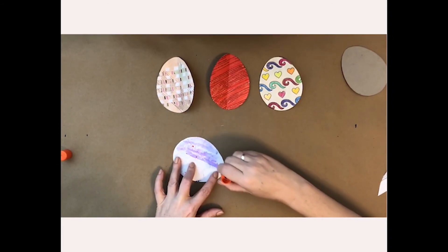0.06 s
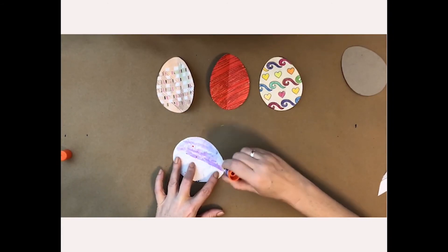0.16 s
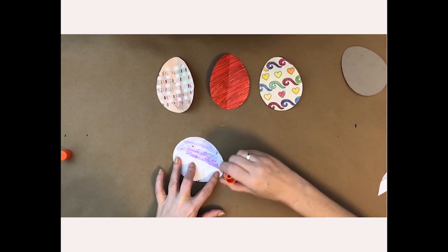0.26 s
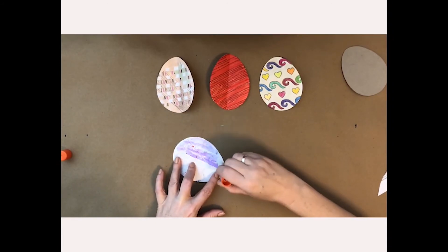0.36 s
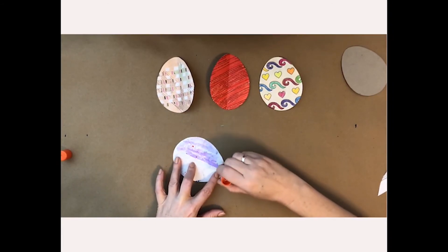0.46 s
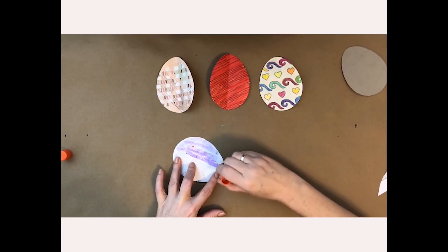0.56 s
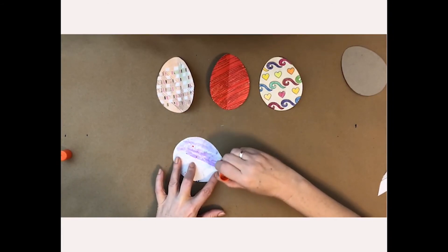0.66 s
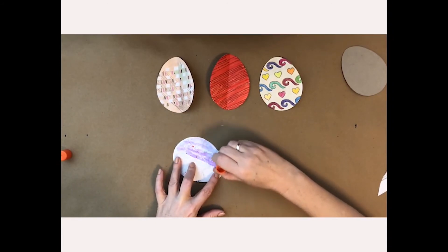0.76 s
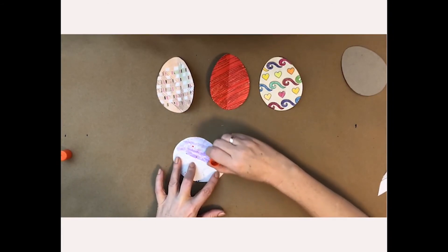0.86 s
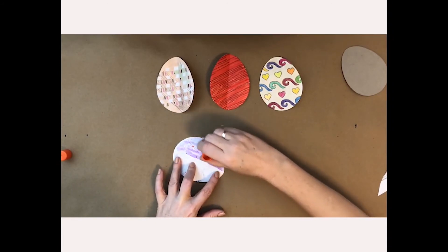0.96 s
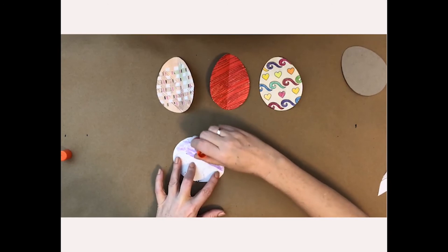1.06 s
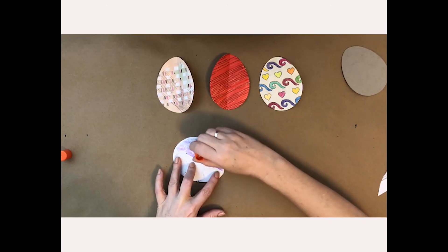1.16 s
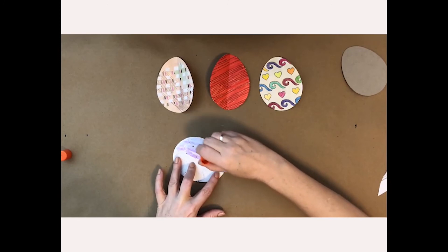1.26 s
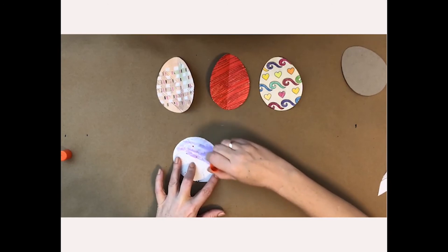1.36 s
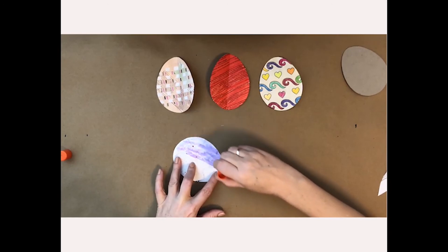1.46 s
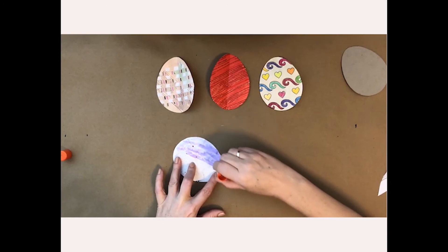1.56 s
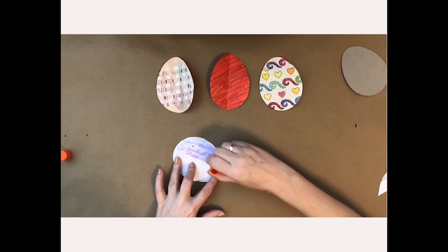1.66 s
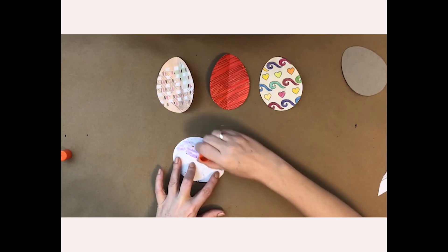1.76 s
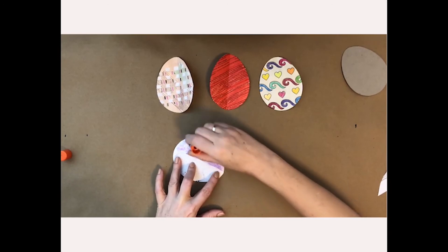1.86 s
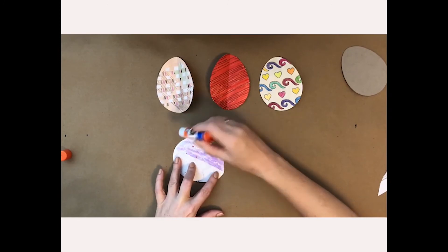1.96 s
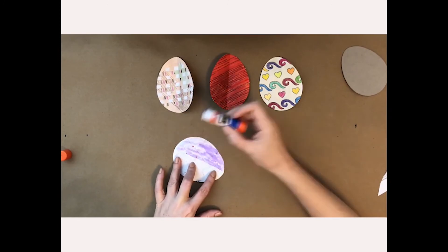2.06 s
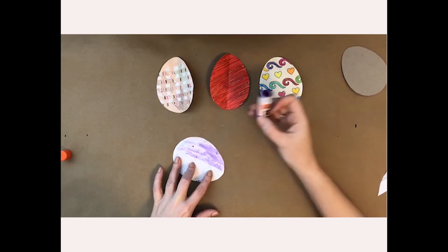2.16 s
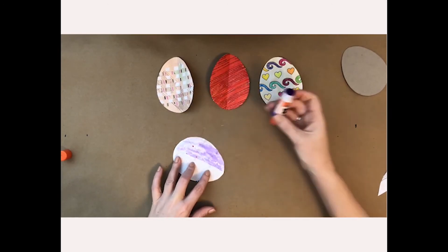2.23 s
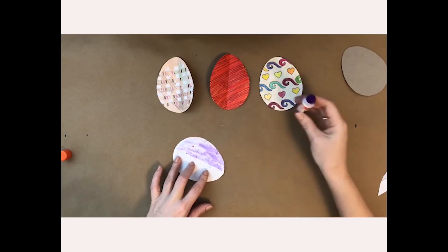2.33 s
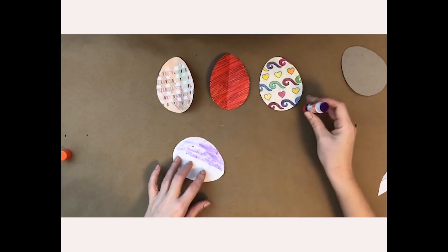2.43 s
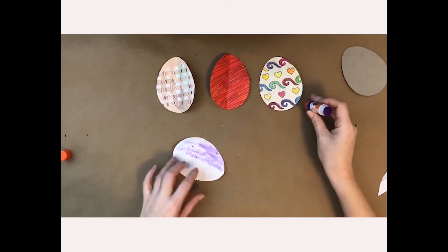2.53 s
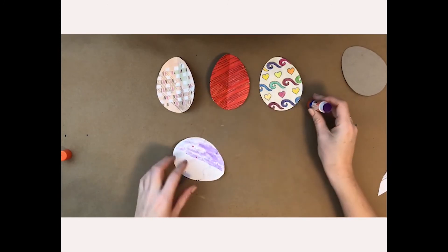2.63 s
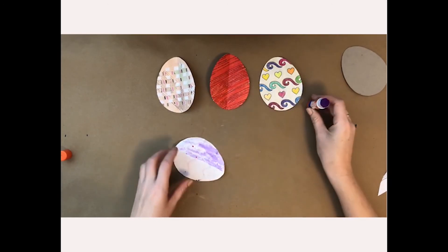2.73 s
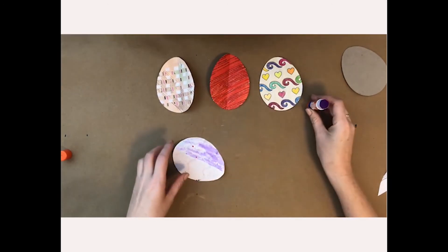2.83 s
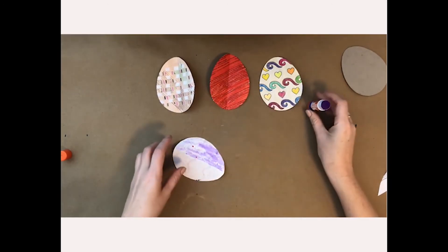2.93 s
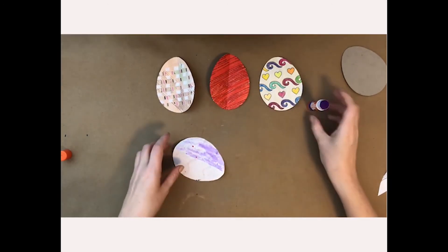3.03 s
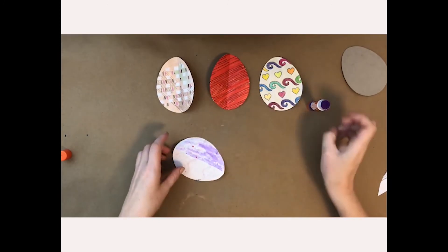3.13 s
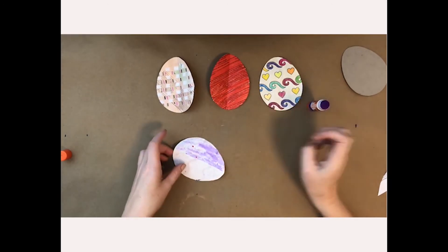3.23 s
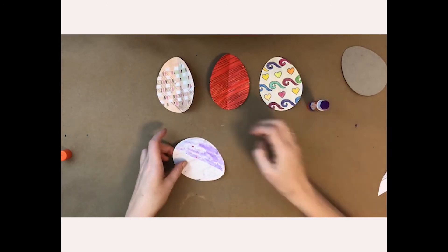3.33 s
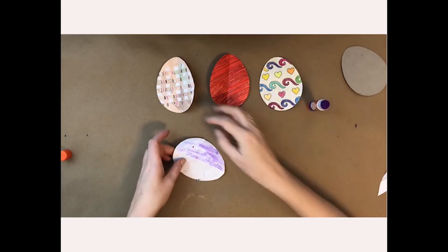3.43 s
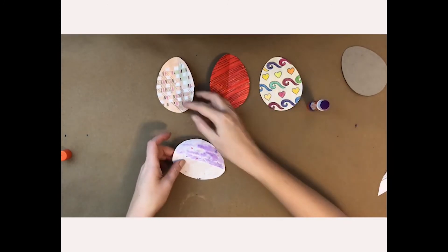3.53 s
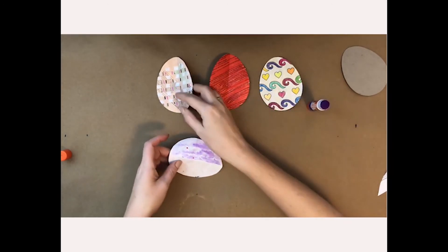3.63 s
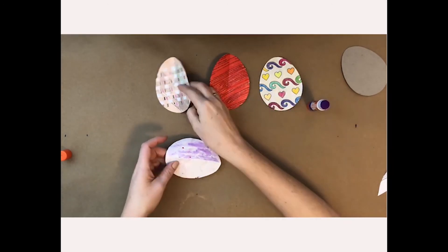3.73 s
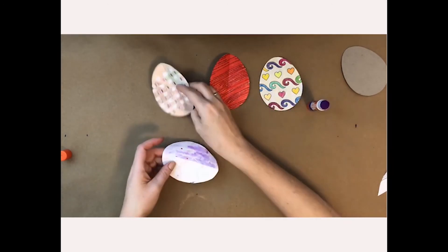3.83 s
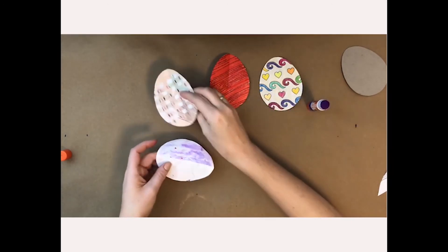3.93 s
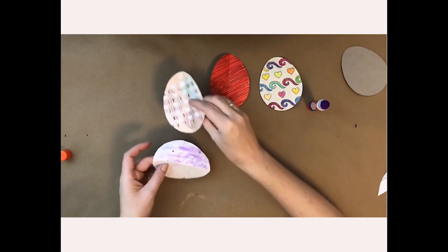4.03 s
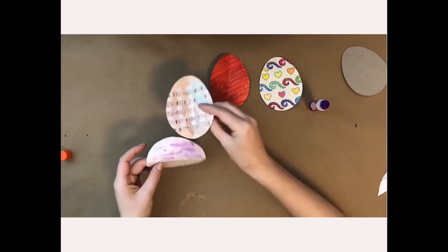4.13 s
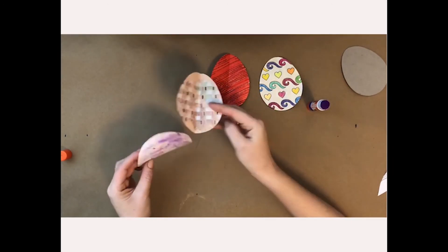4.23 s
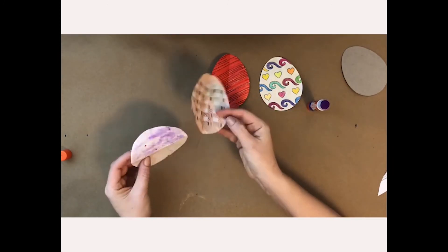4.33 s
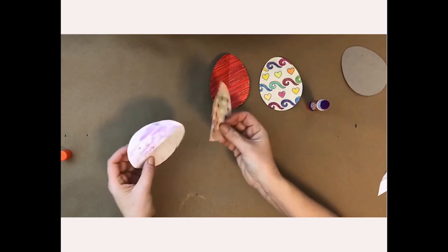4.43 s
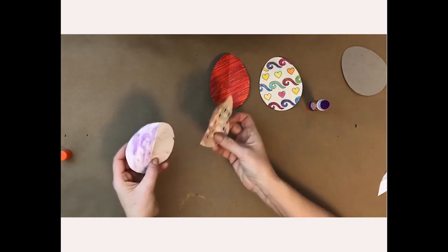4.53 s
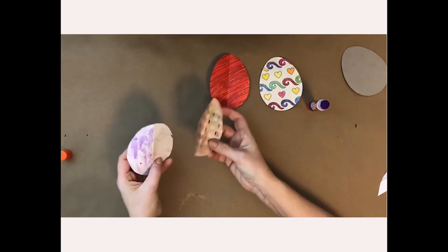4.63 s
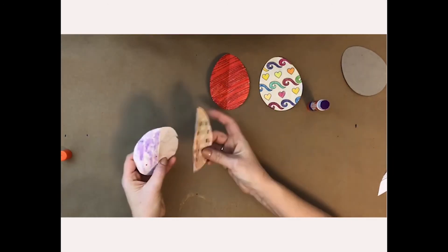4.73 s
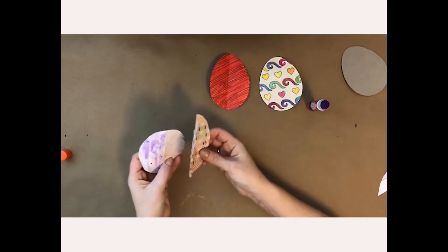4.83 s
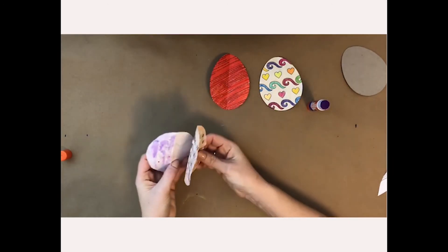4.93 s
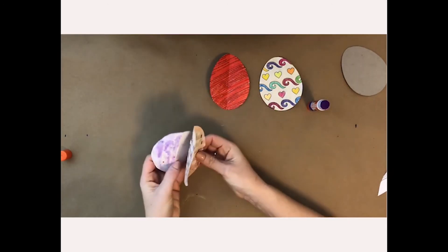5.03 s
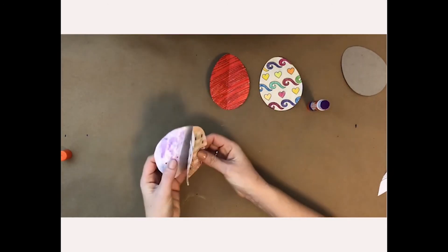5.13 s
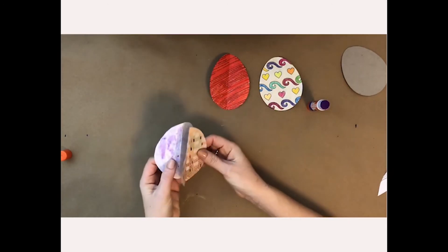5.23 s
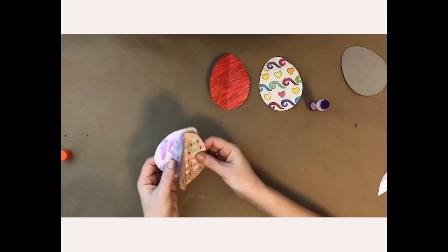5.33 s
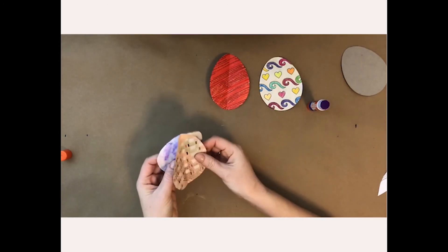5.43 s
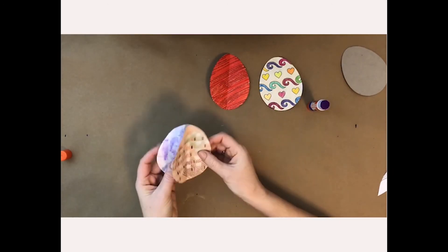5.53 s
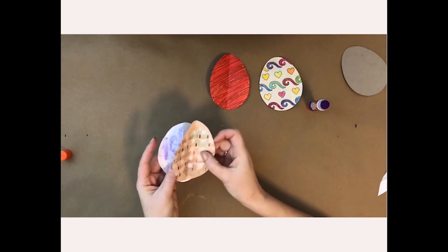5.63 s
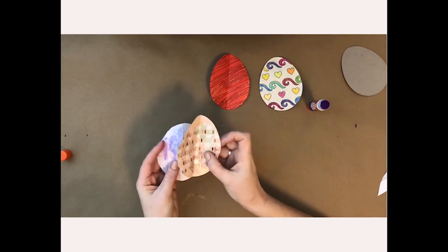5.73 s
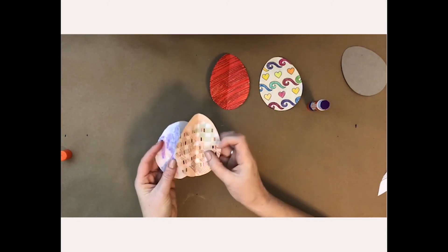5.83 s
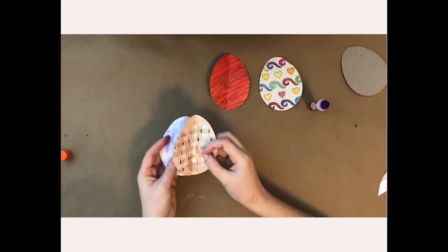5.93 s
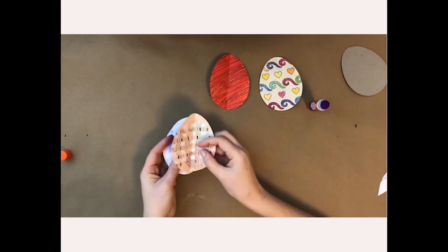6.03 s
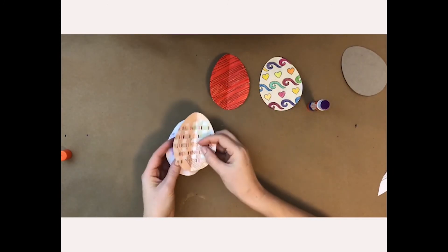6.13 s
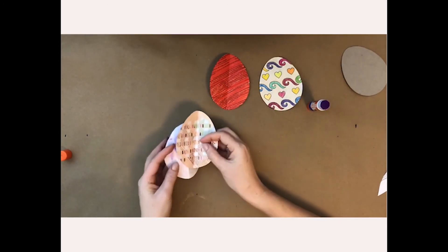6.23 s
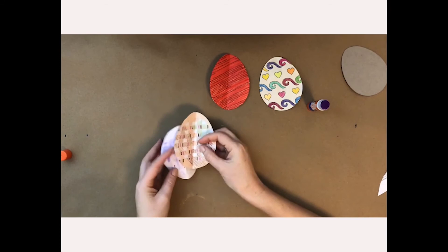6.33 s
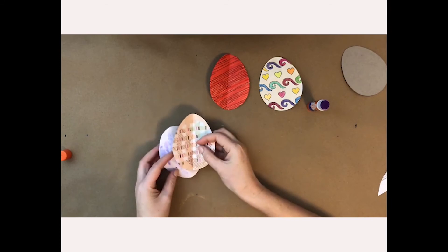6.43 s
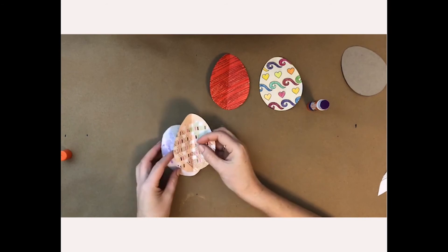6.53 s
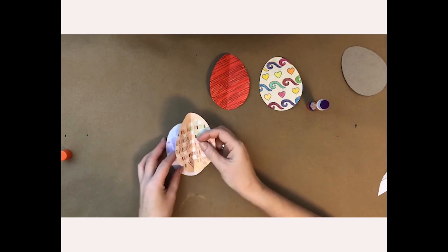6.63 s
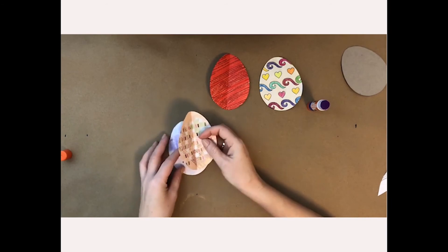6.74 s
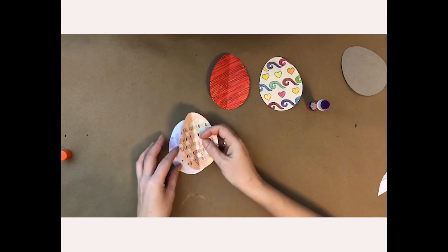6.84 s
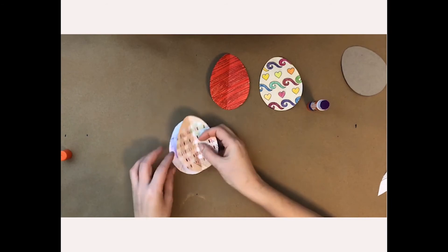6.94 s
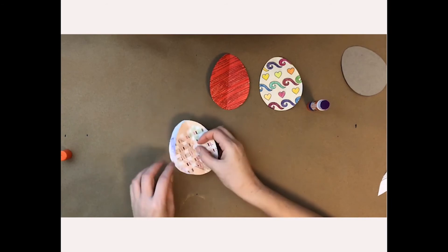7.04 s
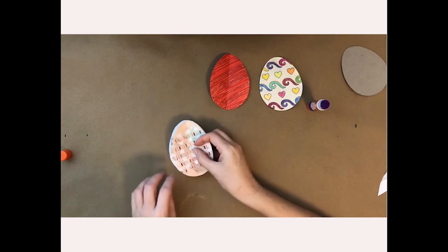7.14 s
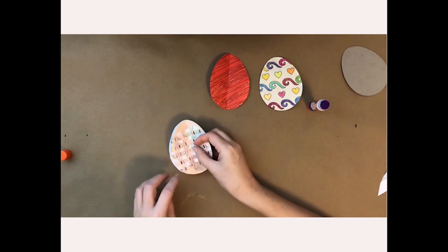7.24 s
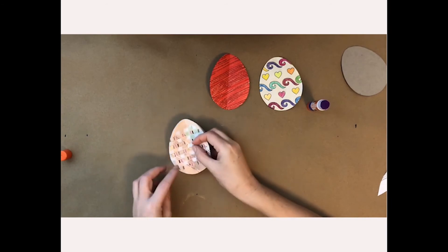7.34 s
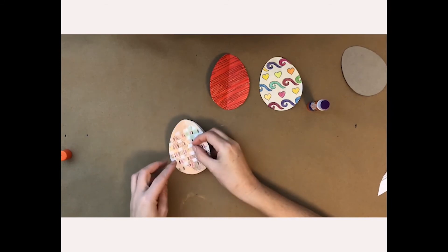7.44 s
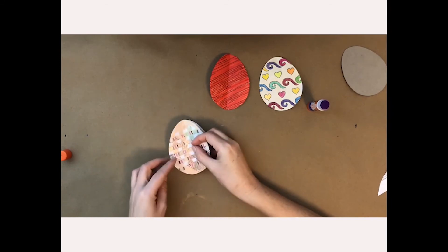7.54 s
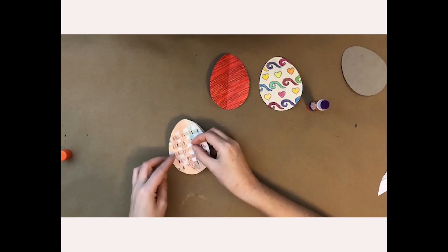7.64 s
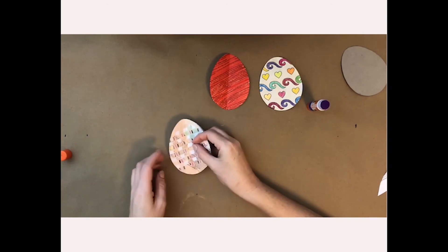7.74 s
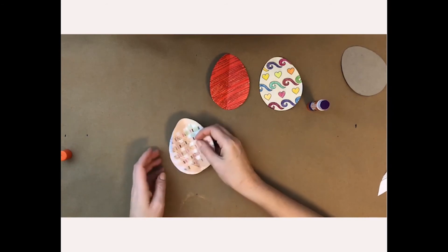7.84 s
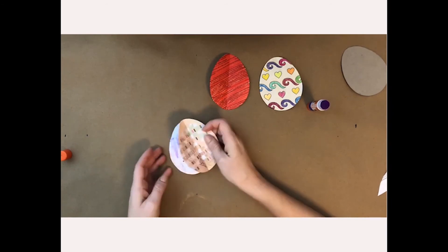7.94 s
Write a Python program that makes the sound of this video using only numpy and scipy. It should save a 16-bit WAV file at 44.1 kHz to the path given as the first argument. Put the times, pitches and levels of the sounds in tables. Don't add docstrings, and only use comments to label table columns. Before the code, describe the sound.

Muffled, low thuds come irregularly from a wooden tabletop under paper. A faint scrape leads to one loud, sharp clack with a tiny rocking rattle and short woody ring. Folded card is then picked up and joined, with dry rustles, small creasing snaps and sticky ticks, densest late, ending in soft slides. One nearby phone-like microphone, small room, gentle hum and hiss.

```python
import sys
import numpy as np
from scipy import signal
from scipy.fft import rfft, irfft, next_fast_len
from scipy.io import wavfile
from scipy.ndimage import uniform_filter1d

SR = 44100
rng = np.random.default_rng(int(sys.argv[2]) if len(sys.argv) > 2 else 0)


def volts(x):
    e = np.asarray(x, float) / 20
    return 10 ** e


def file_out(sig):
    cols = np.atleast_2d(sig).T
    lim = np.clip(cols, -1, 1)
    pcm = np.round(lim * 32767).astype(np.int16)
    wavfile.write(sys.argv[1], SR, pcm)


N = 352359

# frequency in Hz, level in dB per Hz.
AIR_SPECTRUM = [(12, -34), (40, -6), (95, -3.5), (245, -14), (324, -6), (362, -23), (393, -11.5),
                (2400, -14), (5230, -13.5), (15500, -18)]
# frequency in Hz, width in Hz, lift in dB.
ROOM_MODES = [(40, 2.3, -20), (91.1, 7.6, 10), (151, 6.7, 9), (219, 11, 15.5), (231, 17, -6.5),
              (309.4, 19.5, -14), (330.6, 37, 9), (362, 30, -13), (370, 7.2, -16), (480, 22, -17),
              (647, 280, 3.5)]
# peak time, rise and fall in seconds, level in dB.
GUSTS = [
    (1.96, 0.27, 0.33, -45),
    (3.34, 0.31, 0.38, -45),
    (4.78, 0.28, 0.26, -47.5),
    (5.45, 0.45, 0.35, -53),
    (7.56, 0.12, 0.27, -49),
]
AIR_DB, RUMBLE_DB, RUMBLE_DRIFT_DB = -54, -75, 8
ROOM_T60_S, ROOM_DB = 0.15, -10

# start in seconds, peak in dB,
# hardness 0-1.
THUDS = [(0.512, -47, 0), (0.812, -59, 0.3), (1.184, -38.5, 0.16), (1.597, -43, 0.19), (1.791, -53, 0.1),
         (3.091, -51.5, 0.6), (3.744, -63, 0.5), (4.241, -57, 1), (4.748, -57, 0), (5.198, -63, 0.2),
         (5.42, -61, 0.6), (6.092, -58, 0), (6.439, -59, 0.7), (6.63, -59, 0.5), (6.777, -45.5, 0),
         (7.069, -62, 0.5), (7.572, -61, 0.3)]
# frequency in Hz, level in dB, T60 in seconds.
THUD_MODES = [(99.7, 5, 0.31), (134.3, 5.5, 0.32), (160.5, 8.5, 0.2), (227, 0, 0.37), (254, 4, 0.13),
              (328, -5.5, 0.46), (376, 2.5, 0.41), (458, 5, 0.32), (543, -12, .12), (620, -18, .1)]

# frequency in Hz, level in dB, T60 in seconds.
KNOCK_MODES = [(105.2, -9.5, 0.33), (122.7, -19, 0.36), (158, -9.5, 0.17), (262.6, -8.5, 0.17),
               (339.4, -7, 0.24), (380, -16.5, 0.24), (414, -22, 0.15), (511, -20, 0.31), (543, -12, 0.27),
               (597, -5, 0.15), (646, -8, 0.2), (758, -19, 0.15), (790, -16, 0.16), (893, -2.5, 0.074),
               (995, -11, 0.23), (1028, -7.5, 0.068), (1173, -24, 0.16), (1120, -24, 0.19),
               (1210, -20, 0.13), (1260, -13, 0.11), (1390, -18, 0.17), (1400, -27, 0.15),
               (1437, -16, 0.14), (1500, -13, 0.2), (1594, -9.5, 0.15), (1680, -7.5, 0.084),
               (1938, -21, 0.13), (2720, -13.5, 0.099), (2450, -19, .05), (3190, -17.5, 0.09)]
# frequency in Hz, level in dB, T60 in seconds.
STICK_MODES = [(1265, 9, 0.021), (1955, 5.5, 0.0058), (2440, -4.5, 0.024), (4450, -14, 0.014)]
# frequency in Hz, level in dB per Hz.
KNOCK_TAIL = [(90, -32), (200, 0), (330, -8), (480, -14), (700, -3.5), (1300, -11), (1720, -14),
              (1900, -23), (3500, -32.5), (9000, -38.5)]
# start in seconds, level in dB relative to the knock.
BOUNCES = [
    (2.6834, -10),
    (2.703, -11.5),
]
KNOCK_S, KNOCK_DB = 2.6748, -13.5
RIM_S, RIM_DB = 2.6688, -31
PANEL_HZ, PANEL_DB, PANEL_T60_S = (500, 1720), -17, 0.4

# start in seconds, peak in dB, pitch in Hz, brightness in dB.
CREASE_SNAPS = [(3.071, -36, 2620, 0), (3.391, -41, 700, -10), (3.575, -46, 2220, -12),
                (3.733, -39, 804, -15), (3.984, -31.5, 900, -18.5), (4.112, -38, 2570, -6),
                (4.2115, -51, 940, -8), (4.649, -37.5, 680, -12), (4.989, -34, 770, -8),
                (5.149, -31, 800, -10), (5.1875, -35.5, 2650, 10), (5.313, -47, 7500, -20),
                (5.382, -44, 2340, 2), (5.683, -38, 845, 1),
                (6.0246, -23, 2330, -2), (6.074, -31.5, 2600, -0.5), (6.156, -34, 1680, -7),
               (6.213, -31, 2720, -9), (6.221, -27, 2500, -16), (6.433, -31, 2350, -10),
               (6.517, -39, 2220, -10), (6.625, -29.5, 2440, -13), (6.659, -35, 2310, -17),
               (6.682, -32, 2630, -9), (6.762, -26.5, 3220, -22), (6.875, -39, 1680, -10)]
# start in seconds, peak in dB, pitch in Hz, brightness in dB.
FLAPS = [
    (4.221, -45, 980, -18),
    (5.313, -53, 840, -20),
    (6.444, -35, 800, -14),
    (6.625, -31.5, 600, -20),
    (6.766, -29.5, 970, -20),
]
SNAP_T60_S, FLAP_T60_S = 0.039, 0.057

# start in seconds, peak in dB, pitch in Hz.
TICKS = [(1.186, -48, 1600), (1.188, -40, 3300), (3.392, -39, 1500), (3.575, -36, 2200), (3.735, -37, 1200),
         (4.2135, -35, 1060), (4.2123, -24.5, 3120), (4.2045, -31, 2600), (4.2144, -27, 2900),
         (4.2305, -30, 5800), (4.2205, -32.5, 960), (4.9015, -37, 1500), (4.912, -43, 1700),
         (5.1495, -37, 880), (5.1882, -28.5, 2700), (2.4433, -40, 1800), (3.4305, -38, 2450),
         (5.27, -32, 1090), (5.314, -37, 950), (5.280, -34, 1210), (3.707, -39.5, 700), (3.747, -32.5, 800),
         (5.5713, -40, 1200), (6.027, -40, 2380), (6.7624, -26, 3050), (6.7703, -25, 3100),
         (6.0748, -33, 2500), (6.0775, -27, 4000), (6.139, -43, 1520), (6.303, -33, 1600),
         (6.326, -37, 1900), (6.355, -30, 3000), (6.363, -41, 2000), (6.369, -28, 2380), (6.376, -23, 2500),
         (6.383, -32, 2600), (6.394, -24, 4770), (6.434, -35, 2300), (6.440, -38, 2300), (6.449, -36, 2450),
         (6.6265, -30, 800), (6.6828, -27, 2600)]
# start in seconds, peak in dB, pitch in Hz.
CATCHES = [(3.0994, -23, 2710), (3.107, -35, 2910), (3.112, -35, 2690), (3.1155, -29, 2260),
           (3.3921, -33, 705), (3.575, -41, 2300), (3.7935, -36, 2410), (3.8125, -26, 2090),
           (4.2042, -29, 900), (4.4303, -24, 1510), (4.4805, -26, 5060), (4.4969, -29, 4910),
           (4.53, -32, 2500), (4.5465, -34, 2580), (4.5522, -34, 2710), (4.5751, -33, 3290),
           (4.9139, -33, 2950), (4.9269, -27, 3210), (5.1563, -30, 2330), (5.1885, -24, 4780),
           (6.2267, -29, 2520), (6.2302, -34, 2520), (6.3135, -39, 1460), (6.3261, -29, 1960),
           (6.3388, -32, 2300), (6.3633, -28, 2800), (6.3763, -32, 2200), (6.4207, -24, 2130),
           (6.4594, -26, 2410), (6.5809, -26, 2580), (6.5912, -21, 2780), (6.6605, -34, 2350),
           (6.6678, -34, 2580), (6.6871, -33, 2220), (6.6914, -33, 2500), (6.7837, -23, 2820)]
# start in seconds, peak in dB, pitch in Hz.
PRICKS = [(4.2122, -32, 7700), (4.2238, -33, 5600), (4.4667, -34, 5290), (4.8184, -37, 8470),
          (4.9177, -31, 5810), (5.1566, -36, 6350), (5.1845, -30, 6830), (5.3133, -37, 7300),
          (5.5372, -39, 5320), (6.0248, -20, 8900), (6.0262, -25, 7200), (6.0268, -26, 2590),
          (6.0765, -29, 7500), (6.3609, -26, 7470), (6.4362, -33, 9500), (6.377, -30, 7900),
          (6.7615, -29, 5100), (5.288, -38, 900), (6.6605, -35, 1310), (1.188, -44, 2500)]
TICK_CYCLES, CATCH_CYCLES, PRICK_CYCLES = 13, 9, 22
CATCH_DB = -5.5

# middle and length in seconds, level in dB, pitch in Hz.
FLUTTERS = [(2.434, 0.061, -51, 4300), (3.09, 0.031, -46, 2700), (3.621, 0.16, -54, 2230),
            (3.78, 0.039, -45, 3200), (4.484, 0.048, -44, 5170), (4.487, 0.051, -55, 870),
            (4.542, 0.053, -54, 2650), (4.535, 0.08, -47, 1710), (4.923, .05, -46.5, 4570),
            (5.203, 0.023, -51, 5200), (5.283, 0.032, -43, 1210), (6.044, 0.025, -43, 5070),
            (6.326, 0.057, -43, 1570), (6.392, 0.051, -41.5, 4800)]
# peak time and length in seconds, level in dB, pitch in Hz.
RIDGES = [(3.083, 0.065, -50, 4730), (3.11, 0.05, -50, 1340), (3.104, 0.052, -45.5, 2900),
          (3.583, 0.082, -46.5, 2200), (3.666, 0.05, -52, 2070), (3.8, 0.08, -49, 2250),
          (3.937, 0.096, -51, 2330), (3.99, 0.047, -52.5, 568), (3.993, 0.049, -45, 953),
          (4.212, 0.094, -61.5, 2100), (4.213, 0.047, -50, 3740), (4.355, 0.063, -51, 2660),
          (4.491, 0.084, -51, 880), (4.476, 0.057, -44.5, 1720), (4.487, 0.075, -47, 4960),
          (4.532, 0.039, -45, 1370), (4.541, 0.071, -42, 2650), (4.592, 0.057, -49.5, 1120),
          (4.924, 0.061, -48, 2900), (5.155, 0.05, -53, 568), (5.188, 0.048, -46, 1220),
          (5.196, 0.05, -47, 5000), (5.189, 0.061, -46, 2620), (5.178, 0.094, -51.5, 900),
          (5.297, 0.12, -50.5, 842), (5.32, 0.05, -53, 720), (5.465, 0.075, -51, 4940),
          (5.69, 0.061, -53, 816), (6.03, 0.029, -49, 2610), (6.028, 0.037, -50, 3480),
          (6.04, 0.039, -46, 5000), (6.079, 0.047, -48, 2510), (6.084, 0.056, -49, 1970),
          (6.097, 0.044, -54, 690), (6.232, 0.051, -40.5, 2440), (6.312, 0.05, -52, 1460),
          (6.34, 0.035, -43, 2300), (6.373, 0.047, -44, 7700), (6.385, 0.056, -52, 4100),
          (6.376, 0.053, -46, 2140), (6.442, 0.065, -42.5, 2340), (6.591, 0.04, -49, 2780),
          (6.63, 0.047, -51, 560), (6.666, 0.048, -59, 1270), (6.642, 0.23, -53, 2620),
          (6.772, 0.035, -42, 3030), (6.768, 0.047, -49, 1510), (6.772, 0.054, -48, 2320)]
FLUTTER_WIDTH, RIDGE_WIDTH = 0.16, 0.037
FLUTTER_LEAD, RIDGE_LEAD = 0.5, 0.27

# peak time, rise and fall in seconds, level in dB.
FLEXES = [(2.48, 0.17, 0.033, -67), (3.124, 0.006, 0.068, -72), (3.392, 0.013, 0.024, -49),
          (3.748, 0.15, 0.025, -51.5), (4.006, 0.27, 0.064, -50), (4.12, 0.072, 0.053, -52),
          (4.209, 0.004, 0.085, -46), (4.504, 0.42, 0.27, -47.5), (4.978, 0.96, 0.43, -52),
          (5.187, 0.093, 0.09, -52), (5.275, 0.01, 0.087, -49), (5.446, 0.16, 0.85, -52.5),
          (5.705, 0.52, 0.062, -52), (6.099, 0.63, 0.173, -56.5), (6.182, 0.5, 0.043, -58),
          (6.332, 0.024, 0.17, -49.5), (6.443, 0.0064, 0.039, -39.5), (6.663, 0.45, 0.036, -54.5),
          (6.763, 0.0031, 0.085, -44.5), (7.965, 0.21, 0.054, -52.5)]
# peak time, rise and fall in seconds, level in dB.
DRAGS = [(1.997, 0.041, 0.027, -60), (2.489, 0.26, 0.02, -54), (2.977, 0.42, 0.068, -58.5),
         (3.105, 0.037, 0.083, -40.5), (3.25, 0.04, 0.1, -52), (3.418, 0.099, 0.73, -49.5),
         (3.57, 0.054, 0.93, -50), (3.781, 0.096, 0.156, -46), (3.942, 0.049, 0.036, -58),
         (4.127, 0.12, 0.034, -65), (4.204, 0.003, 0.63, -58.5), (4.54, 0.099, 0.059, -41.5),
         (4.938, 0.66, 0.14, -49.5), (5.039, 0.027, 0.2, -50), (5.188, 0.1, 0.13, -46.5),
         (5.27, 0.014, 0.2, -46), (5.523, 0.021, 0.16, -49.5), (6.028, 0.58, 0.083, -57),
         (6.076, 0.004, 0.055, -45), (6.226, 0.026, 0.049, -36.5), (6.386, 0.29, 0.058, -41),
         (6.436, 0.006, 0.063, -45), (6.52, 0.0066, 0.16, -45.5), (6.62, 0.14, 0.29, -43),
         (6.765, 0.005, 0.041, -44), (6.993, 0.47, 0.091, -47), (7.105, 0.017, 0.086, -50),
         (7.27, 0.2, 0.12, -54.5), (7.608, 0.037, 0.05, -56), (7.913, 0.19, 0.26, -48)]
# peak time, rise and fall in seconds, level in dB.
BRUSHES = [(2.03, 0.18, 0.35, -54.5), (2.435, 0.036, 0.058, -56), (3.025, 0.13, 0.034, -52),
           (3.072, 0.004, 0.21, -51), (3.267, 0.037, 0.134, -58.8), (3.637, 0.34, 0.078, -50.5),
           (3.806, 0.13, 0.1, -47), (3.923, 0.078, 0.14, -53), (4.143, 0.29, 0.029, -56),
           (4.211, 0.005, 0.096, -47), (4.485, 0.34, 0.26, -43.5), (4.914, 0.47, 0.44, -51.5),
           (4.925, 0.03, 0.05, -59), (5.189, 0.02, 0.09, -43), (5.165, 0.02, 0.05, -50),
           (5.384, 0.26, 0.059, -51.5), (5.464, 0.13, 0.28, -48.5), (5.541, 0.014, 0.39, -47.5),
           (5.81, 0.027, 0.12, -53.5), (5.92, 0.06, 0.1, -58), (6.026, 0.003, 0.039, -39.5),
           (6.26, 0.49, 0.25, -48.5), (6.371, 0.026, 0.3, -45), (6.52, 0.006, 0.073, -65),
           (6.6, 0.089, 0.051, -46), (6.689, 0.018, 0.33, -48), (6.738, 0.014, 0.16, -50),
           (7.0, 0.11, 0.069, -59), (7.128, 0.026, 0.026, -57), (7.886, 0.17, 0.43, -51)]
# middle and length in seconds, depth in
# dB.
LULLS = [(3.173, 0.077, 2.5), (3.88, 0.08, -0.5), (3.979, 0.084, 0), (4.185, 0.099, 5.5),
         (4.284, 0.101, 2.5), (4.713, 0.089, 1), (4.815, 0.031, 3), (4.888, 0.055, 4), (4.997, 0.075, 1),
         (5.613, 0.058, 2), (5.82, 0.058, 1), (6.015, 0.11, 4.5), (6.5, 0.05, 3), (6.555, 0.084, -1),
         (5.26, 0.03, 0), (4.205, 0.012, 5), (6.668, 0.066, 1), (6.837, 0.09, 5), (6.934, 0.048, 3),
         (7.004, 0.107, 3), (7.783, 0.061, -1.5), (7.96, 0.035, 0.5)]
# frequency in Hz, width in Hz, lift in dB.
SHEET_MODES = [(477, 43, -5.5), (900, 218, 8.5), (1270, 330, 3), (1680, 110, 1.5), (2220, 77, 0.5),
               (2700, 67, 2), (3500, 400, -2), (5100, 610, 2.5), (7060, 220, 2.5)]
SLIDE_HZ = [870, 2300, 5100, 10200]
FLEX_DB, DRAG_DB, BRUSH_DB = (1, -2.5, -9.5, -14), (-10.5, 2, -4, -11.5), (-32, -3, 1.5, -2.5)
SWELL_SHAPE = 1.336
LULL_SCALE = 0.99


def unit(x):
    return x / np.sqrt(np.mean(x ** 2))


def band(x, lo_hz, hi_hz, passes=1):
    sos = signal.butter(2, [lo_hz, hi_hz], "bandpass", fs=SR, output="sos")
    for _ in range(passes):
        x = signal.sosfilt(sos, x)
    return x


def colour(x, points, peaks=()):
    size = next_fast_len(len(x))
    hz = np.arange(size // 2 + 1) * SR / size + 1
    points_hz, points_db = np.transpose(points)
    gain_db = np.interp(np.log(hz), np.log(points_hz), points_db)
    for peak_hz, width_hz, lift_db in peaks:
        gain_db = gain_db + lift_db / (1 + (2 * (hz - peak_hz) / width_hz) ** 2)
    return irfft(rfft(x, size) * volts(gain_db), size)[:len(x)]


def walk(rate_hz):
    k = int(SR / rate_hz)
    steps = np.repeat(rng.standard_normal(N // k + 1), k)
    return unit(uniform_filter1d(uniform_filter1d(steps, k), k)[:N])


def push(at_s, length_s):
    t = (np.arange(N) / SR - at_s) / length_s
    force = np.where((t > 0) & (t < 1), np.sin(np.pi * t), 0)
    return force / force.sum()


def ring(force, modes, rise_s):
    t = np.arange(SR) / SR
    response = sum(volts(db - 60 * t / t60_s) * np.sin(2 * np.pi * hz * t) for hz, db, t60_s in modes)
    return signal.fftconvolve(force, response * (1 - np.exp(-t / rise_s)))[:N]


def swells(rows):
    t = np.arange(0, N, 32) / SR
    at_s, rise_s, fall_s, db = np.transpose(rows)[:, :, None]
    away = np.where(t < at_s, (at_s - t) / rise_s, (t - at_s) / fall_s)
    power = np.sum(volts(db - 20 * away ** SWELL_SHAPE) ** 2, axis=0)
    return np.interp(np.arange(N) / SR, t, power)


def air():
    tone = unit(colour(rng.standard_normal(N), AIR_SPECTRUM, ROOM_MODES))
    steady = volts(RUMBLE_DB + RUMBLE_DRIFT_DB * walk(7.1))
    strength = np.sqrt(swells(GUSTS) + steady ** 2)
    rumble = unit(band(rng.standard_normal(N), 17, 34, passes=2)) * strength * volts(-9)
    return tone * volts(AIR_DB + 0.45 * walk(5.5)) + rumble


def room(x):
    t = np.arange(SR // 2) / SR
    tail = band(rng.standard_normal(len(t)), 180, 11600) * volts(-60 * t / ROOM_T60_S) * (t > 0.004)
    tail = tail / np.sqrt(np.sum(tail ** 2))
    return x + volts(ROOM_DB) * signal.fftconvolve(x, tail)[:N]


def thuds():
    force = sum(volts(db) * push(at_s, 0.0034 / (1 + hardness)) for at_s, db, hardness in THUDS)
    return volts(-6.5) * band(ring(force, THUD_MODES, rise_s=0.0024), 64, 2000)


def knock():
    t = np.arange(N) / SR

    def fade(at_s, t60_s):
        return (t > at_s) * volts(-60 * np.abs(t - at_s) / t60_s)

    table = band(-ring(push(KNOCK_S, 0.00021), KNOCK_MODES, rise_s=0.00046), 106, 12000, passes=2)
    landing = push(KNOCK_S + 0.00091, 0.00008)
    rocking = sum(volts(db) * push(at_s, 0.0003) for at_s, db in BOUNCES)
    tube = ring(landing + rocking, STICK_MODES, rise_s=0.0001)
    wood = unit(colour(rng.standard_normal(N), KNOCK_TAIL))
    tail = band(wood * fade(KNOCK_S + 0.0018, 0.24), 310, 7300)
    rim = unit(band(rng.standard_normal(N), 1700, 4200)) * fade(RIM_S, 0.045)
    return volts(KNOCK_DB) * (table + tube + volts(-4.5) * tail) + volts(RIM_DB) * rim


def panel():
    t = np.arange(N) / SR - KNOCK_S
    edges = signal.ellip(4, 1, 40, PANEL_HZ, "bandpass", fs=SR, output="sos")
    dense = unit(signal.sosfilt(edges, rng.standard_normal(N)))
    onset = np.clip(t / 0.02, 0, 1)
    return dense * volts(KNOCK_DB + PANEL_DB - 60 * np.abs(t) / PANEL_T60_S) * onset


def snaps():
    out = np.zeros(N + SR)
    t = np.arange(SR // 4) / SR
    for rows, t60_s in ((CREASE_SNAPS, SNAP_T60_S), (FLAPS, FLAP_T60_S)):
        fade = np.exp(-np.log(1000) * t / t60_s)
        for at_s, db, hz, bright_db in rows:
            body, crack = rng.standard_normal((2, len(t)))
            body = unit(band(body, hz * 0.82, hz * 1.114)) * fade
            crack = unit(band(crack, 740, 10800, passes=2)) * fade ** 1.4
            start = int(at_s * SR)
            out[start:start + len(t)] += volts(db - 4.5) * (body + volts(bright_db) * crack)
    return out[:N]


def ticks(rows, cycles):
    out = np.zeros(N + SR)
    t = np.arange(SR // 20) / SR
    for at_s, db, hz in rows:
        phase = 2 * np.pi * hz * t
        tone = np.sin(phase) + volts(-10.5) * np.sin(2.26 * phase) + volts(-33) * np.sin(0.49 * phase)
        start = int(at_s * SR)
        out[start:start + len(t)] -= volts(db - 60 * t * hz / cycles) * tone
    return band(out[:N], 360, 10000)


def flutters(rows, width, lead):
    out = np.zeros(N + SR)
    for at_s, length_s, db, hz in rows:
        hiss = unit(band(rng.standard_normal(SR // 4), hz * (1 - width), hz * (1 + width)))
        size = int(min(length_s, 0.2) * SR)
        warped = (np.arange(size) / size) ** (np.log(0.5) / np.log(lead))
        swell = np.sin(np.pi * warped) ** 2
        start = int(at_s * SR - lead * size)
        out[start:start + size] += volts(db) * swell * hiss[-size:]
    return out[:N]


def ease():
    gain_db = np.zeros(N + SR)
    for at_s, length_s, depth_db in LULLS:
        size = int(length_s * SR)
        start = int(at_s * SR) - size // 2
        gain_db[start:start + size] -= LULL_SCALE * depth_db * np.hanning(size)
    return volts(gain_db[:N])


def slide():
    colours = volts(np.transpose([FLEX_DB, DRAG_DB, BRUSH_DB])) ** 2
    power = colours @ [swells(FLEXES), swells(DRAGS), swells(BRUSHES)]
    levels_db = 10 * np.log10(power + 1e-12)
    jerk_db = 1.2 * walk(260)
    slip_db = 2 * np.minimum(rng.exponential(size=N), 7)
    slips = unit(rng.standard_normal(N) * volts(slip_db + jerk_db))
    slips = colour(slips, [(330, -8), (420, -6), (560, 2.5), (900, 0), (2300, 8.5), (5000, 8),
                           (9000, 11), (14500, -1)], SHEET_MODES)
    out = 0
    for k, hz in enumerate(340 * 2 ** (np.arange(28) / 5)):
        share = [np.interp(np.log(hz), np.log(SLIDE_HZ), row) for row in np.eye(len(SLIDE_HZ))]
        patch = (-1) ** k * band(slips, hz * 0.933, hz * 1.072) / np.sqrt(hz / 2000)
        bend_db = 0.9 * min(1, 2000 / hz) ** 0.35
        out = out + patch * volts(share @ levels_db + bend_db * walk(18))
    return out * volts(-1)


def scene():
    table = thuds() + knock() + panel()
    paper = slide() * ease() + snaps()
    paper = paper + ticks(TICKS, TICK_CYCLES) + ticks(PRICKS, PRICK_CYCLES)
    paper = paper + volts(CATCH_DB) * ticks(CATCHES, CATCH_CYCLES)
    paper = paper + flutters(FLUTTERS, FLUTTER_WIDTH, FLUTTER_LEAD)
    paper = paper + flutters(RIDGES, RIDGE_WIDTH, RIDGE_LEAD)
    mono = air() + table + room(paper)
    return np.array([mono, mono])


def top_cut(x):
    return signal.sosfilt(signal.butter(12, 16620, fs=SR, output="sos"), x)


def record(dry):
    low_pass = signal.ellip(10, 0.2, 80, 15730, fs=SR, output="sos")
    mix = signal.sosfilt(low_pass, dry)
    return top_cut(mix)


dry = scene()
out = record(dry)
file_out(out)
```